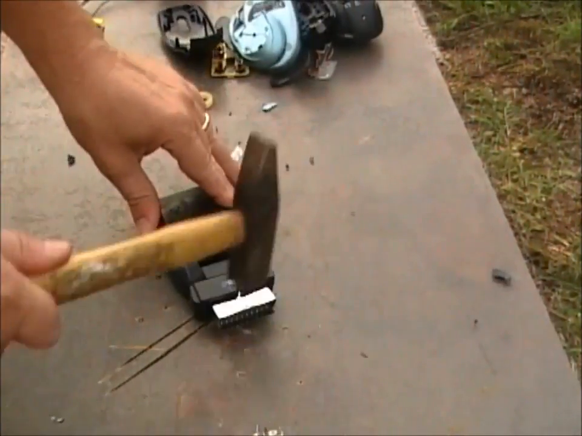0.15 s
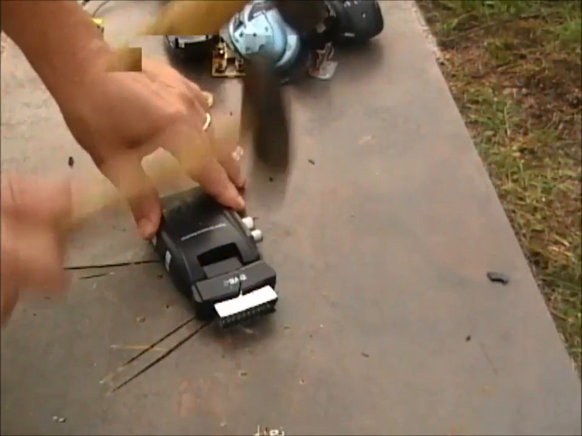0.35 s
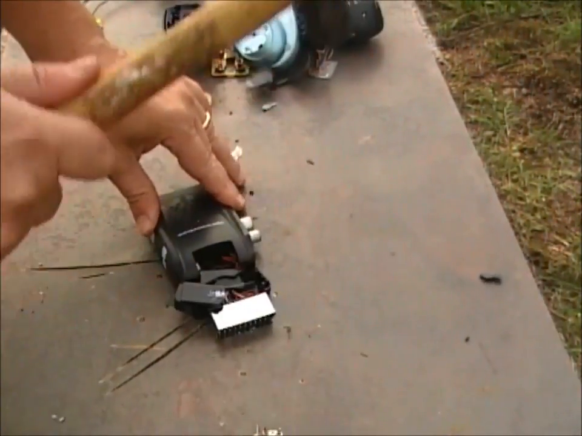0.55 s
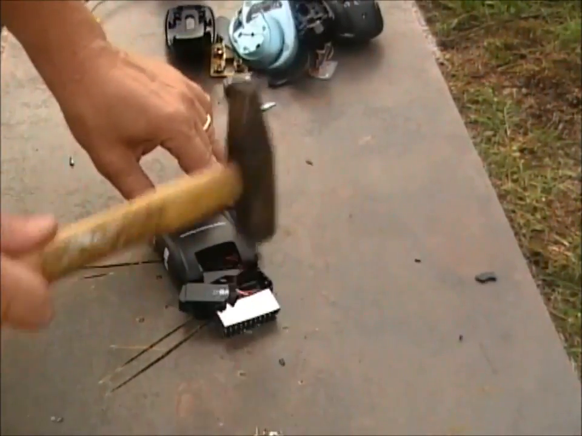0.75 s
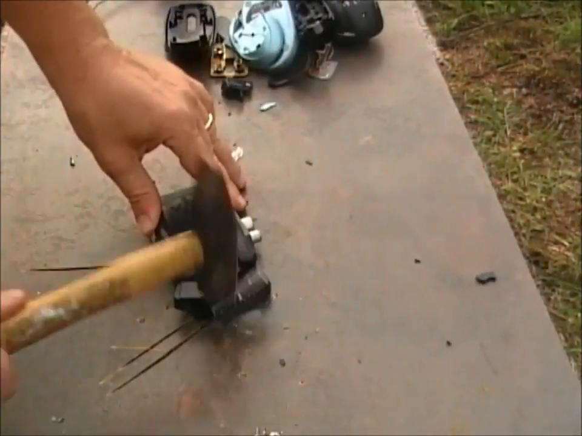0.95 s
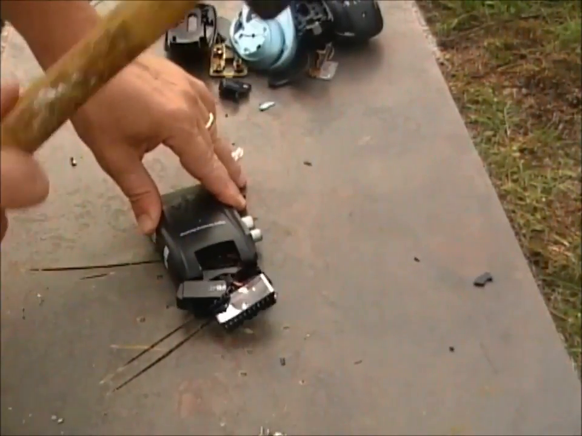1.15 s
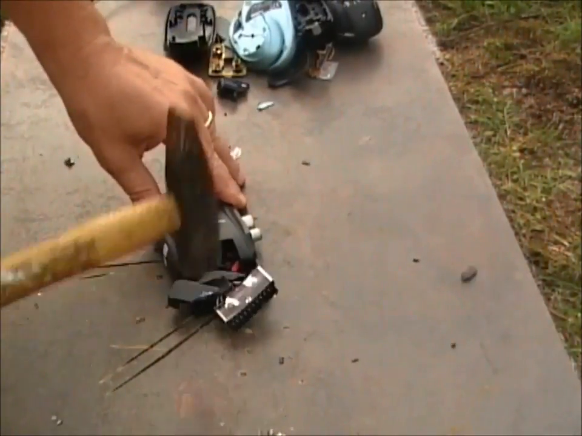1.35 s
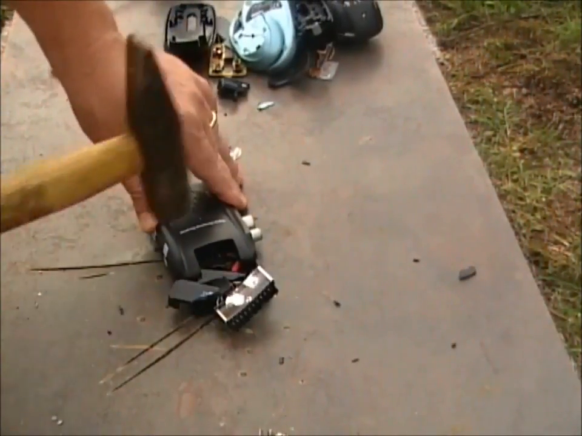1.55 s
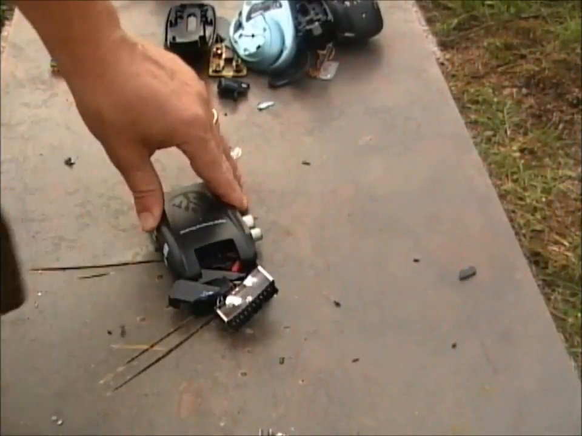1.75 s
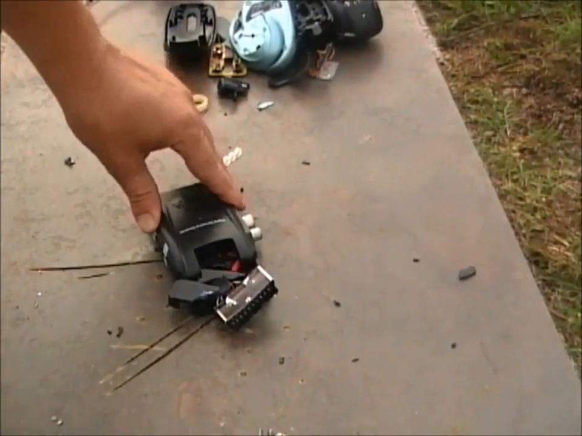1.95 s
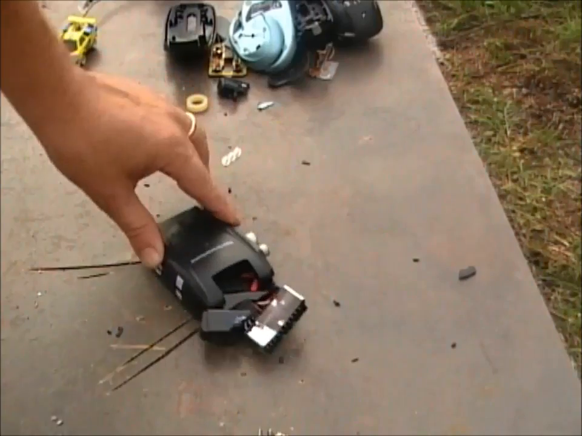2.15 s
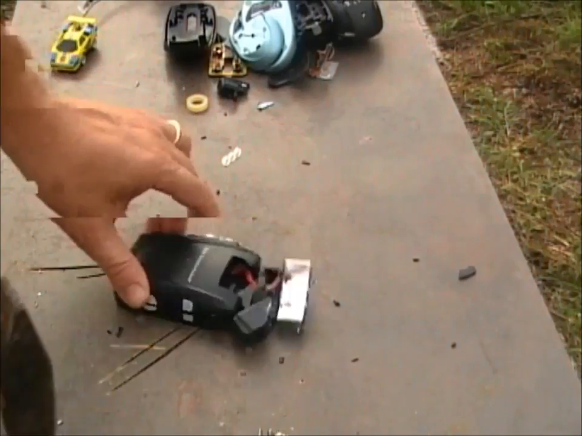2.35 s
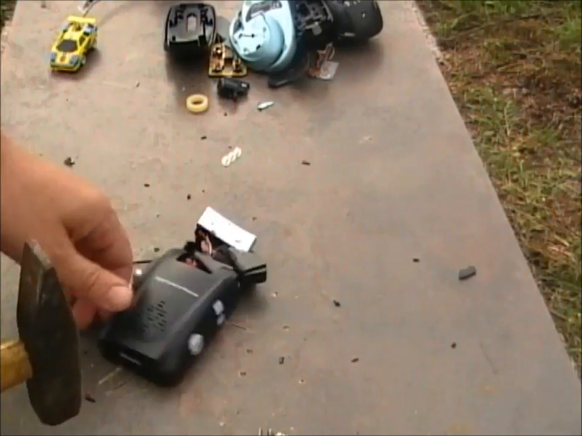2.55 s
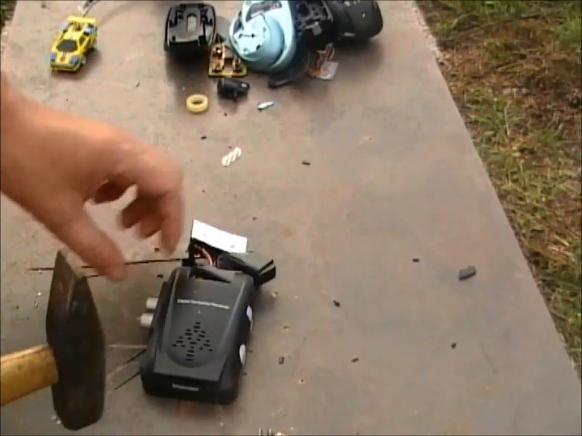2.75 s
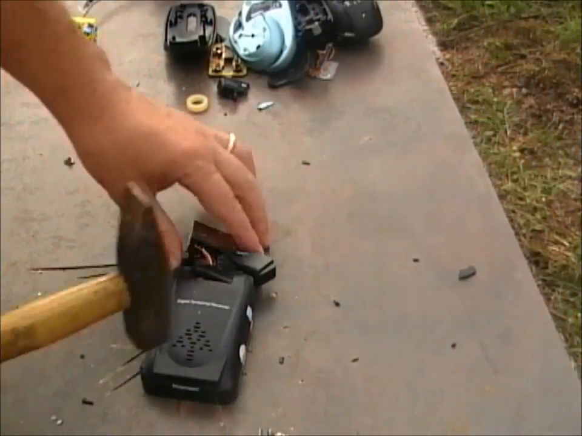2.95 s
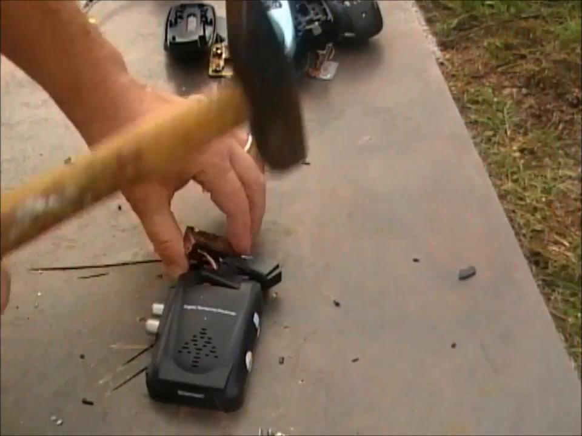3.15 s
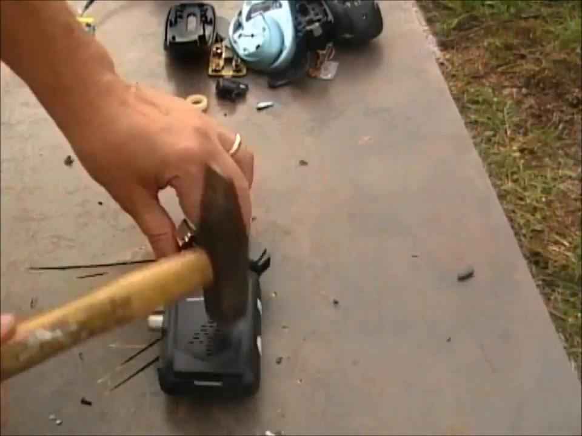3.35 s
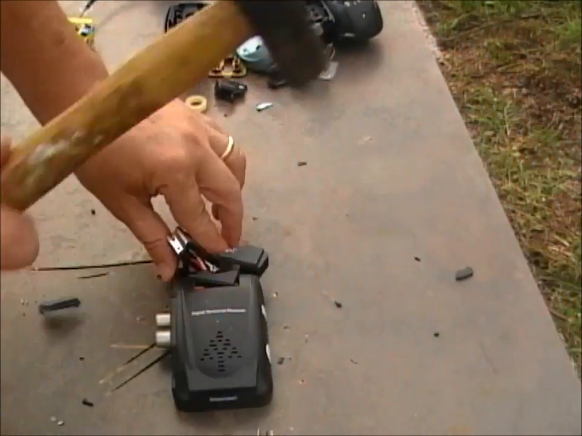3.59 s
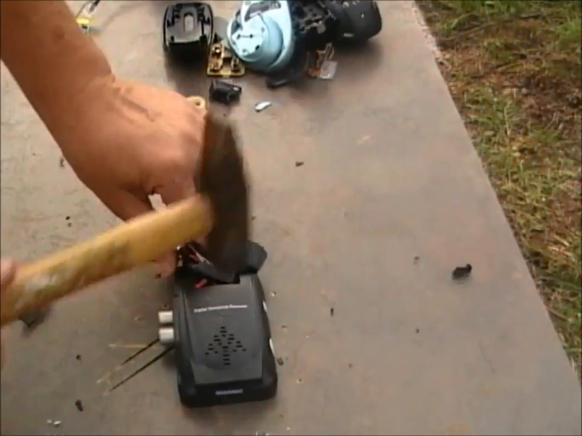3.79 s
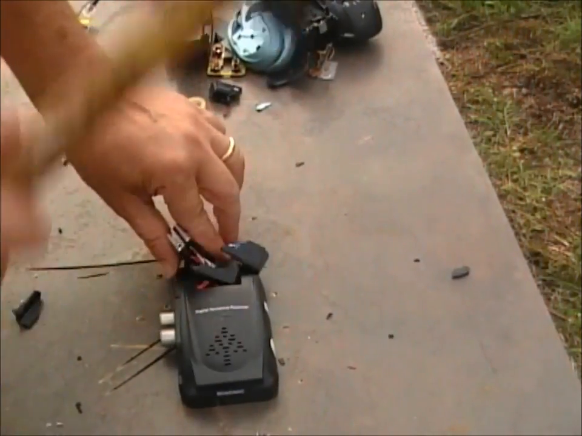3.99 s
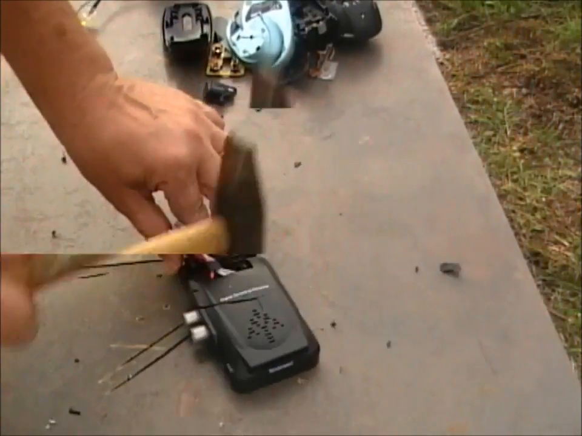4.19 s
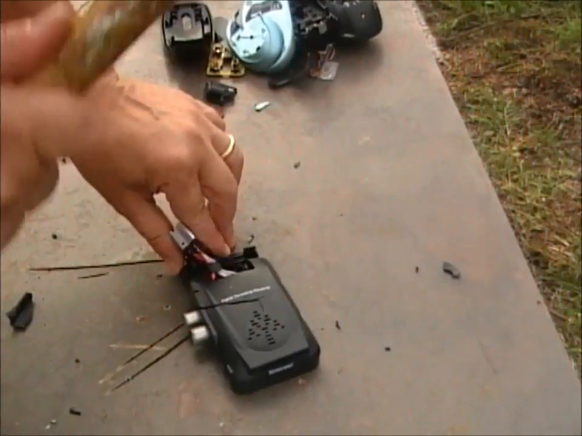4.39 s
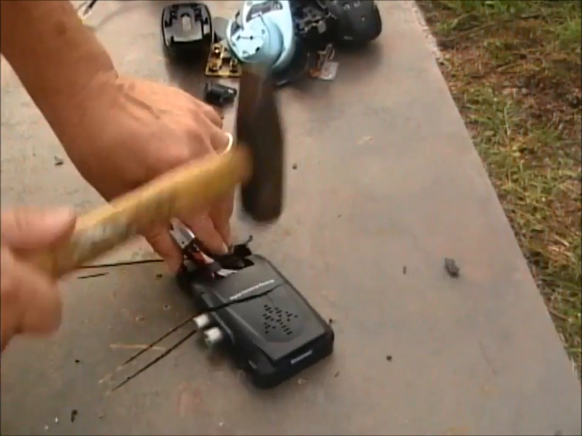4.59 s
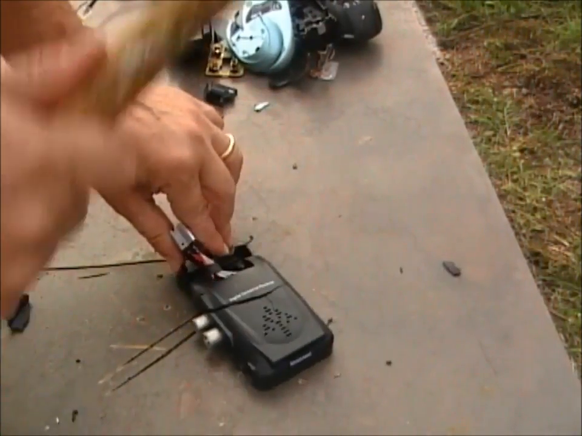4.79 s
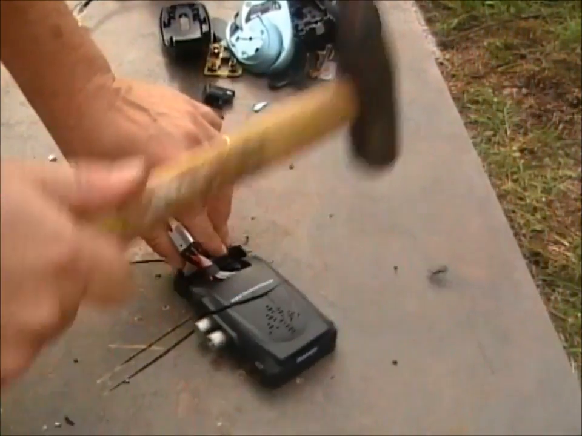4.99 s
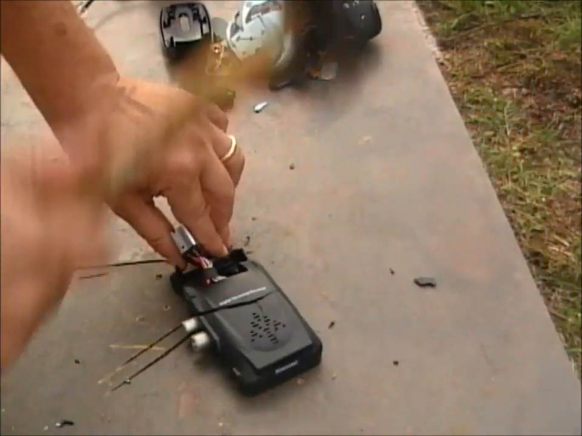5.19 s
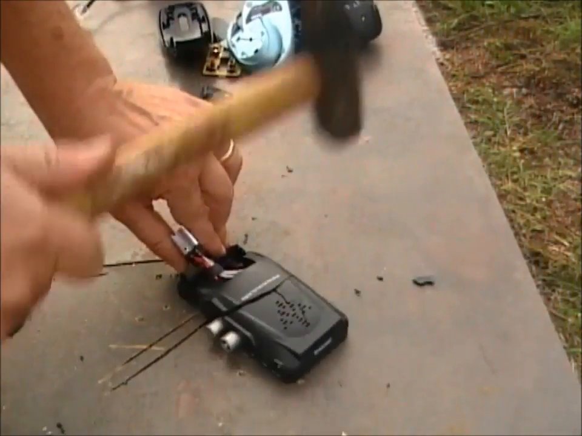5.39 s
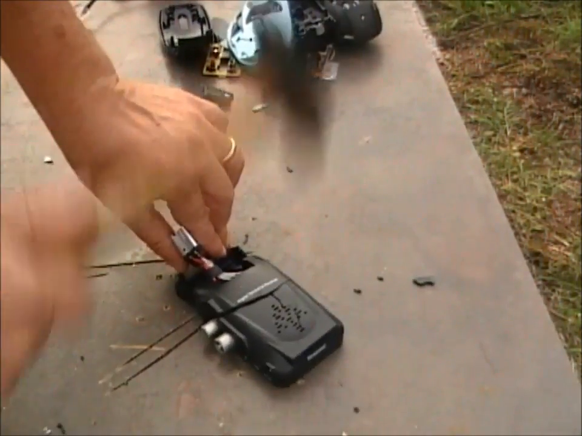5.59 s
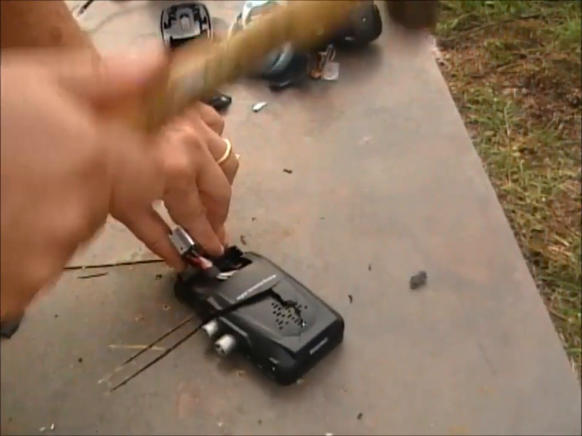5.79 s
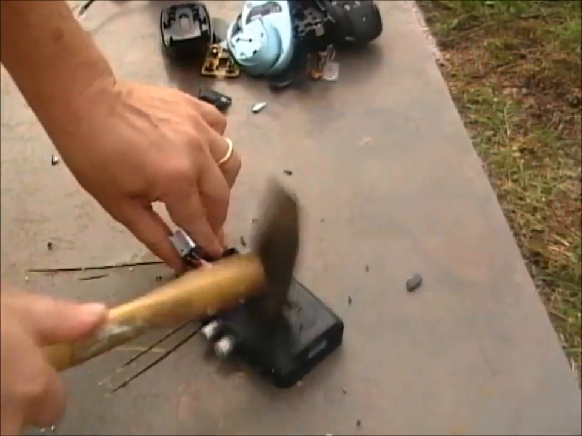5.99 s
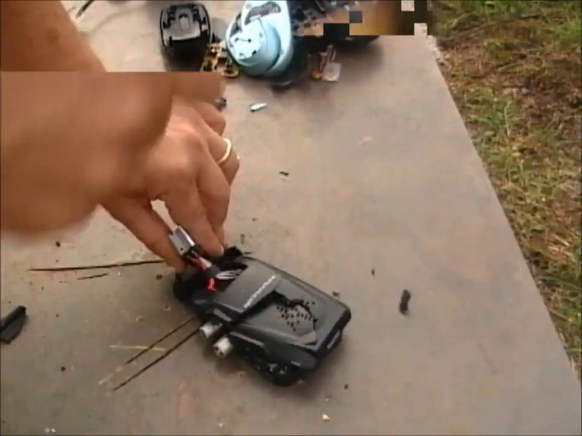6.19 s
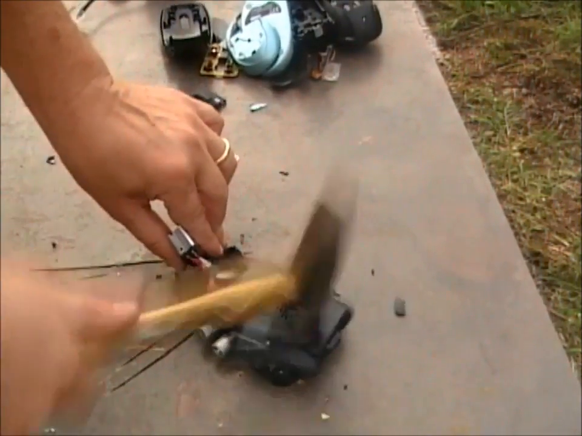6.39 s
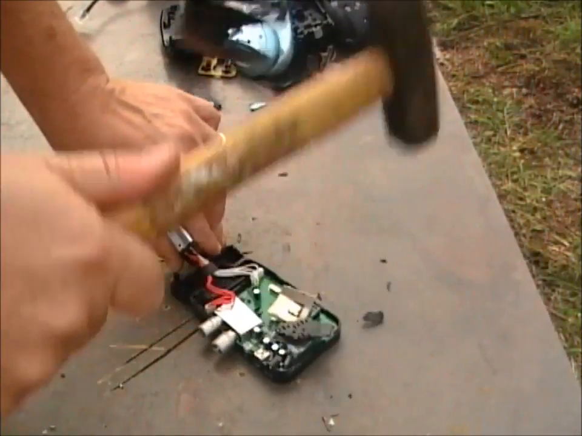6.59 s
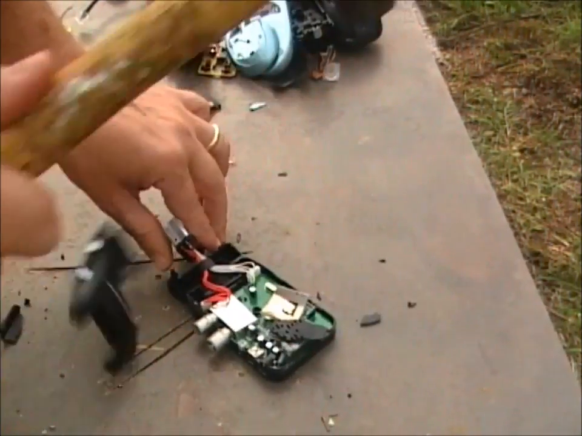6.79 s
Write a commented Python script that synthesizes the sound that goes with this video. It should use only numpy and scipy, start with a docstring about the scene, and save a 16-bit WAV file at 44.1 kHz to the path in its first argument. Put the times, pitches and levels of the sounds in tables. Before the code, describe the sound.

Outdoors, a hammer strikes a hollow plastic box on a hard board: five quick, loud cracks with short hollow knocks and small clicking bounces. A gritty, slightly metallic scrape follows as the box is dragged and turned. Nine slower blows then smash the casing, each trailed by rattling plastic pieces. Faint low traffic hums behind. Close, thin camcorder sound, the peaks overloaded, with brief dropouts.

```python
"""A hammer beats a plastic electronics box on a hard board outdoors: noise bursts ring the shell, clicks are pieces bouncing.
Then the box is dragged over the gritty board (grainy noise through resonances), and a second series of blows follows.
Low modes, rumble and far-wall echoes accompany the blows; far traffic hums throughout as shaped noise.
A tape camcorder listens: bass cut, overload, comb against head-drum whine, a few lost frames, top cut."""
import sys
import numpy as np
from scipy import signal
from scipy.fft import rfft, irfft
from scipy.io import wavfile

SR = 44100
rng = np.random.default_rng(int(sys.argv[2]) if len(sys.argv) > 2 else 0)


def wrap_up_sound(samples):
    """Save the sound to the file named by the first command line argument, as 16-bit audio."""
    columns = np.atleast_2d(samples).T
    # keep every value between -1 and 1, then stretch to whole-number steps
    tamed = np.clip(columns, -1, 1)
    steps = np.round(tamed * 32767).astype(np.int16)
    wavfile.write(sys.argv[1], SR, steps)


N = 301599

# hammer blows, levels relative within each layer: (time [s], impact [dB], crack [dB], splinters [dB],
# hollow box [dB], board [dB], deep push [dB], upper box modes [dB])
BLOWS = [(0.117, 4.5, -9, -29.5, -27.5, -36.5, -37.5, -36.5),
         (0.415, 5, -8, -32.5, -25.5, -36, -46.5, -17.5), (0.709, 2, -21.5, -36, -6, -15, -35.5, -4.5),
         (0.9842, -6, -7, -34.5, -8.5, -13, -39, -8.5), (1.262, 1.5, -23, -29.5, -7.5, -13, -49.5, -7),
         (3.3283, 15, 8, -25.5, -32.5, -15.5, -23.5, -29.5), (3.7049, 1, 1, -25.5, -14, -21.5, -38, -14),
         (4.0804, 3, -5.5, -24.5, -21.5, -8.5, -14.5, -25),
         (4.5159, 0, -6.5, -25.5, -27.5, -19, -25.5, -16), (4.8993, 2, -6.5, -28.5, -8, -13.5, -38, -7),
         (5.2699, -7, -5.5, -26.5, -6.5, -14, -52, -5.5), (5.6591, 4.5, -18.5, -27.5, -4.5, -15, -41, -3),
         (6.0315, -4, -7.5, -23, -3.5, -12, -44, -6), (6.4365, -6, -13, -22, -4.5, -12, -32, -6.5)]
# box and splinters falling back on the board, levels relative:
# (time [s], level [dB], ring [Hz], ring against tick [dB], t60 [s], hollow box [dB])
BOUNCES = [(0.173, -17.5, 3580, 19.5, 0.048, -28), (0.2031, -23, 3630, 16, 0.054, -28),
           (0.279, -44, 6500, 8, .04, -55), (0.4906, -23, 4100, 15, 0.024, -26),
           (0.555, -23, 4650, 20.5, 0.025, -45), (0.6071, -31.5, 4610, 21, 0.055, -49),
           (0.617, -17, 9600, 7.5, 0.049, -42.5), (0.6673, -34.5, 4600, 23, 0.037, -53.5),
           (0.7854, -23, 4040, 21.5, 0.06, -26.5), (1.038, -23, 5100, 13, 0.087, -41),
           (1.0629, -23.5, 3480, 11, 0.082, -27.5), (1.3291, -21.5, 12900, 8, 0.081, -31),
           (1.534, -37.5, 4470, -1, 0.034, -81), (1.5673, -42, 11000, 11, 0.035, -70),
           (1.6306, -37, 9460, 22, 0.039, -74), (1.644, -34.5, 10200, 24.5, .046, -69),
           (1.6764, -41, 9800, 18, .034, -69), (1.7028, -38, 10180, 20.5, 0.093, -72),
           (1.8298, -41, 1610, 4, .093, -71), (2.6922, -27, 11800, 11, 0.031, -61),
           (3.0215, -31.5, 3300, 12, 0.11, -34), (3.262, -43, 8500, 23.5, .06, -47),
           (3.3916, -28, 1550, 6, .053, -26.5), (3.4231, -20.5, 4160, 18, 0.087, -24),
           (3.4735, -21, 1600, 10, 0.033, -28.5), (3.5153, -29, 1840, 4, 0.023, -62),
           (3.5563, -27, 5930, 15, 0.021, -50.5), (3.611, -39, 7000, 5.5, 0.043, -43),
           (3.6297, -30, 5800, 16.5, .041, -47), (3.6822, -29.5, 6500, 3, 0.025, -46),
           (3.7286, -27, 4200, 16.5, 0.29, -24.5), (3.758, -4, 1640, 2, 0.079, -25.5),
           (3.8011, -13.5, 4130, 18, 0.029, -28.5), (3.8406, -43, 4340, 24, 0.16, -41),
           (3.86, -15.5, 1620, 12.5, 0.019, -29), (3.927, -42.5, 4760, 24, 0.036, -49),
           (3.9938, -34.5, 8800, 16, 0.029, -58), (4.0257, -52, 8600, 25, 0.066, -70.5),
           (4.1227, 0.5, 6960, -0.5, 0.065, -21), (4.132, 1, 3140, 8, 0.047, -15.5),
           (4.1759, -15, 7070, 13, 0.033, -22), (4.2268, -15, 4170, 18.5, 0.027, -33),
           (4.3497, -53, 2580, 3, .045, -38.5), (4.4162, -43, 9040, 15, 0.094, -63),
           (4.573, -24, 1640, 16, 0.066, -26), (4.6159, -14.5, 4160, 22.5, 0.03, -22.5),
           (4.6665, -21.5, 4100, 17, .048, -34.5), (4.736, -41, 8300, 16, 0.12, -53),
           (4.828, -46.5, 8400, 25.5, 0.094, -60), (4.8575, -38, 8240, 14, 0.083, -41),
           (4.9966, -12, 7740, 7, 0.045, -20), (5.0454, -29.5, 4140, 3, 0.096, -26.5),
           (5.1413, -34.5, 2460, 13, 0.056, -40), (5.3681, -15.5, 7700, 5, 0.12, -23),
           (5.4225, -21, 7500, -13, 0.19, -35.5), (5.505, -39, 9600, 2, 0.079, -60),
           (5.5488, -44, 5430, 7, .07, -71), (5.7, -6.5, 3540, 14.5, 0.095, -19),
           (5.7514, -19, 2960, 11, 0.099, -21), (5.7978, -27.5, 2510, 13, 0.054, -25),
           (5.8247, -37, 7000, 6, 0.044, -33.5), (5.8726, -41.5, 5900, 15, 0.097, -43),
           (6.0739, -2, 3700, 14.5, 0.03, -14), (6.127, -15, 2840, 6, .11, -33),
           (6.1392, -25, 7660, 9, 0.032, -21.5), (6.1834, -18.5, 3840, 5, 0.12, -22.5),
           (6.2885, -37.5, 7900, 19, 0.14, -41), (6.4879, -16, 4180, 19.5, 0.12, -37),
           (6.5409, -19.5, 4120, 11, 0.14, -21), (6.5981, -19, 4000, 13.5, 0.065, -28),
           (6.6258, -28, 3190, 11, 0.28, -23.5), (6.7274, -15.5, 2680, 12.5, 0.023, -63)]


def from_db(db):
    """Gain of a level in dB."""
    return 10 ** (np.asarray(db) / 20)


def rms_one(x):
    """Scaled to rms 1."""
    return x / np.sqrt(np.mean(x ** 2) + 1e-20)


def bandpass(x, order, edges_hz):
    """Butterworth band-pass."""
    return signal.sosfilt(signal.butter(order, edges_hz, "band", fs=SR, output="sos"), x)


def highpass(x, hz):
    """First-order bass cut."""
    return signal.sosfilt(signal.butter(1, hz, "high", fs=SR, output="sos"), x)


def curve(rows, column):
    """One dB column as a gain in time, -120 dB outside the table."""
    rows = np.array(rows)
    db = np.interp(np.arange(N) / SR, rows[:, 0], rows[:, column], left=-120, right=-120)
    return from_db(db)


def coloured(x, spectrum, tilt_db_per_octave=0.):
    """Noise shaped by a spectrum and tilted about 4 kHz (tilt gain constant below 500 Hz), rms 1."""
    hz = np.maximum(np.fft.rfftfreq(x.shape[-1], 1 / SR), 1)
    points = np.array(spectrum)
    db = np.interp(np.log(hz), np.log(points[:, 0]), points[:, 1])
    db += tilt_db_per_octave * np.log2(np.maximum(hz, 500) / 4000)
    return rms_one(irfft(rfft(x) * from_db(db), x.shape[-1]))


def resonance(x, hz, width_hz):
    """Two-pole peak of gain about 1."""
    r = np.exp(-np.pi * width_hz / SR)
    numerator = np.array([1, 0, -1]) * (1 - r * r) / 2
    return signal.lfilter(numerator, [1, -2 * r * np.cos(2 * np.pi * hz / SR), r * r], x)


def ring(clicks, hz, t60_s):
    """A unit click sets a decaying sine of initial height 1 ringing."""
    r, w = from_db(-60 / (t60_s * SR)), 2 * np.pi * hz / SR
    return signal.lfilter([0, np.sin(w)], [1, -2 * r * np.cos(w), r * r], clicks + 1e-18)


def pair(count, side_db):
    """Stereo noise: a shared part plus an opposed part at side_db against it."""
    mid, side = rng.standard_normal((2, count))
    return mid + from_db(side_db) * side * [[1], [-1]]


def grainy(count, grain_s, spread_db):
    """Uneven gain of rms 1: random level per grain, interpolated in dB."""
    knots = np.arange(0, count + grain_s * SR + 1, grain_s * SR)
    level = np.interp(np.arange(count), knots, rng.standard_normal(len(knots)))
    return rms_one(from_db(spread_db * level))


def patter(x, grain_s, spread_db):
    """Each frequency band patters separately, under its own uneven gain."""
    # band edges: (frequency [Hz])
    edges_hz = [300, 1500, 3000, 5500, 9000, 18000]
    bands = zip(edges_hz, edges_hz[1:])
    return sum(bandpass(x, 1, band) * grainy(x.shape[1], grain_s, spread_db) for band in bands)


def add(out, s, sound):
    """Mixes a sound in at time s."""
    i = round(s * SR)
    out[:, i:i + sound.shape[1]] += sound[:, :N - i]


def dying(t, t60_s, rise_s):
    """Exponential rise (time constant rise_s) and fall."""
    return (1 - np.exp(-t / rise_s)) * from_db(-60 * t / t60_s)


def cracks():
    """Each blow: bright impact, fractures ringing the shell, then a splinter shower that dies more slowly."""
    # plastic shell modes: (frequency [Hz], width [Hz], level [dB])
    shell_modes = [(1366, 166, 4), (1807, 85, -3.5), (2220, 100, -18.5), (3220, 840, -3), (4430, 75, -18.5),
                   (6700, 230, -4.5), (8140, 200, 1.5), (11600, 490, -19)]
    # crack spectrum: (frequency [Hz], density [dB per Hz])
    crack_spectrum = [(150, -32), (500, 1.5), (1000, -10), (1800, -5.5), (3250, -4), (6000, -4),
                      (9900, -5.5), (15000, -8.5), (17000, -1.5)]
    t60_at_0_db_s, halving_db = 0.031, 11.5   # t60 doubles for each halving_db below 0 dB
    out, t = np.zeros((2, N)), np.arange(SR // 2) / SR
    for s, impact_db, crack_db, splinter_db, *_ in BLOWS:
        t60_s = t60_at_0_db_s * 2 ** (-crack_db / halving_db)
        noise = pair(len(t), side_db=-13.0)
        shell = sum(from_db(db + rng.normal(0, 3.5)) * resonance(noise, hz, width_hz)
                    for hz, width_hz, db in shell_modes)
        ringing = coloured(noise + 1.3 * shell, crack_spectrum, tilt_db_per_octave=-1.5)
        bright = coloured(noise, crack_spectrum, tilt_db_per_octave=2.2)
        impact = from_db(impact_db + 3.0) * dying(t, .016, .0004) * bright
        burst = from_db(crack_db) * dying(t, t60_s, 0.00044) * grainy(len(t), 0.0031, 0.75)
        shower = from_db(splinter_db) * dying(t, 0.44, 0.0016) * grainy(len(t), .003, 5.4)
        shower = shower * patter(ringing, grain_s=.005, spread_db=9.0)
        add(out, s - .0004, impact + ringing * burst + shower)
    return out


def falls():
    """Every piece that falls back: the table, and one random light crumb after each blow."""
    count = len(BLOWS)
    times_s = np.array(BLOWS)[:, 0] + rng.uniform(0.099, 0.16, count)
    rings_hz = 4500 * (12000 / 4500) ** rng.random(count)
    levels_db = -47 + 6 * rng.random(count)
    ring_db, t60_s = 16, 0.035
    crumbs = [(s, db, hz, ring_db, t60_s) for s, db, hz in zip(times_s, levels_db, rings_hz)]
    return BOUNCES + crumbs


def bounces():
    """Each fall-back: a tick and a fading run of random clicks excite the ring of the piece that lands."""
    chatter_per_s, chatter_per_db = 1200, 1.2   # click rate of a 0 dB piece; lighter pieces chatter less
    heavy_rise_s, rise_per_db = .003, 1.22   # rise of a 0 dB piece; lighter ones start more sharply
    tick_octaves, tick_octaves_per_db = 2.8, .045   # spread each side of the ring at 0 dB; lighter: less
    out, t = np.zeros((2, N)), np.arange(SR // 7) / SR
    for s, db, hz, ring_db, t60_s, *_ in falls():
        spread = 2 ** max(tick_octaves + tick_octaves_per_db * db, .6)
        pan_db = rng.normal(-2, 2.5)   # left minus right
        touched = rng.random(len(t)) < chatter_per_s * from_db(chatter_per_db * db) / SR
        clicks = touched * rng.uniform(-4.0, 14.0, len(t))
        clicks[np.flatnonzero(t > .0001)[0]] = 7.7   # the first touch
        # heavy pieces scratch more
        scratch = np.clip(1.18 + db / 45, .25, 1.2) * pair(len(t), side_db=-16.5)
        fall = dying(t, t60_s, heavy_rise_s * from_db(rise_per_db * db))
        noise = (clicks + scratch * grainy(len(t), .0015, 5)) * fall
        noise *= np.sqrt(np.mean(fall ** 2)) / np.sqrt(np.mean(noise ** 2))
        tick = bandpass(noise, 2, [max(hz / spread, 400), min(hz * spread, 19000)])
        width_hz = (70 + 0.0073 * hz) * from_db(max(db + 12.5, 0))   # heavy pieces ring broader
        piece = resonance(noise, hz, width_hz) + 0.15 * resonance(noise, min(1.85 * hz, 15000), 220.0)
        landing = from_db(db - 8.0) * (tick + from_db(ring_db) * piece)
        add(out, s - .0003, landing * from_db([[pan_db / 2], [-pan_db / 2]]))
    return out


def rocking():
    """The box rocks on: faint random pushes that die away after each blow."""
    out, t = np.zeros((1, N)), np.arange(SR // 2) / SR
    for s, _, _, splinter_db, *_ in BLOWS:
        add(out, s, from_db(splinter_db - 23) * dying(t, 0.38, 0.014)[None])
    return out[0] * grainy(N, .01, 5.0)


def boom():
    """Blows, bounces and rocking push the low modes of box and board through a soft contact (low-pass)."""
    # hollow box on the board: (frequency [Hz], relative level [dB], t60 [s])
    box_modes = [(124, -37, 0.013), (212.7, -6, 0.12), (380.4, -4.5, 0.092), (424.8, -12.5, 0.16),
                 (536.7, -4.5, 0.062), (621, -23, 0.23), (742, -21.5, 0.22)]
    thump_db, thump_per_db = -21.5, 0.93   # the board answers a share of each bounce's hollow knock
    blows, landings, out = np.array(BLOWS), np.array(BOUNCES), np.zeros(N)
    at = np.round(np.r_[blows[:, 0] + .0016, landings[:, 0]] * SR).astype(int).clip(0, N - 1)
    low_db = np.r_[blows[:, 5], thump_db + thump_per_db * landings[:, 5]] + 2.5
    middle_db = np.r_[blows[:, 4] + 1.5, landings[:, 5] - 4.0]
    high_db = np.r_[blows[:, 7] + 3.0, landings[:, 5] - 4.0]
    pushes = rocking()
    chance_db = rng.normal(0, 1.8, (len(at), len(box_modes)))
    for k, (hz, db, t60_s) in enumerate(box_modes):
        strike_db = low_db if k < 2 else middle_db if k < 4 else high_db
        clicks = from_db(db) * pushes * rng.standard_normal(N)
        clicks[at] += from_db(strike_db + db + chance_db[:, k])
        out += ring(clicks, hz, t60_s) * grainy(N, .008, 3)   # the loose shell makes each mode waver
    return signal.lfilter(*signal.butter(2, 900, fs=SR), out)


def rumble():
    """The board shudders under each blow: a deep 100 Hz push, a dull knock, and low noise dying in two stages."""
    shudder, knock, push = np.zeros((2, N)), np.zeros((2, N)), np.zeros((1, N))
    t = np.arange(SR // 2) / SR
    for s, _, _, _, box_db, _, push_db, _ in BLOWS:
        shudder_db = -15 + 0.25 * box_db   # grows a little with the hollow knock
        decay = dying(t, 0.098, 0.00053) + 0.13 * dying(t, 0.43, .01)
        add(shudder, s, from_db(shudder_db) * pair(len(t), side_db=-6.0) * decay)
        add(push, s, from_db(push_db) * np.sin(2 * np.pi * 100 * t)[None] * dying(t, 0.07, .001))
        add(knock, s, from_db(box_db - 4.5) * pair(len(t), side_db=-13.5) * dying(t, 0.048, 0.00078))
    return 3.82 * bandpass(shudder, 2, [110, 800]) + push + 4.0 * resonance(knock, 470, 300)


def drag():
    """Dense grit under the box: fine grains drive thin metal rings, coarser scratches drive the shell."""
    # two drags: (time [s], hiss [dB], body [dB]), relative levels
    strokes = [
        [(2.0, -92, -81), (2.048, -48, -45.5), (2.136, -55.5, -49.5), (2.216, -42.5, -41), (2.288, -61, -54),
         (2.33, -52, -46.5), (2.44, -38.5, -39.5), (2.54, -39, -39), (2.576, -49, -35.5), (2.706, -50.5, -47.5),
         (2.742, -81, -70)],
        [(2.99, -69, -70), (3.028, -47, -39), (3.07, -56.5, -51.5), (3.25, -68, -68), (3.264, -50, -52.5),
         (3.32, -60, -57)],
    ]
    # metal parts singing: (frequency [Hz], width [Hz], level [dB])
    metal_modes = [(7800, 420, -3.5), (8800, 170, -9), (9370, 88, 4), (10000, 110, -5), (11000, 150, 4),
                   (11100, 80, -4.5), (12670, 80, 7), (14700, 200, -16.5)]
    # shell under the drag: (frequency [Hz], width [Hz], level [dB])
    dragged_modes = [(593, 53, 5.5), (790, 190, 0), (1660, 270, 3), (2970, 140, -4.5)]
    a, b = round(strokes[0][0][0] * SR), round(strokes[-1][-1][0] * SR)
    count = b - a
    grit = pair(count, side_db=-12.0) * grainy(count, 0.0033, 1.9)
    hiss = bandpass(grit, 2, [3500, 13000])
    rings = sum(from_db(db) * grainy(count, .03, 5) * resonance(grit, hz, width_hz)
                for hz, width_hz, db in metal_modes)
    scratch = pair(count, side_db=-21.5) * grainy(count, 0.0088, 2.1)
    body = bandpass(scratch, 2, [1200, 4000])
    rasp = sum(from_db(db) * grainy(count, 0.012, 4.0) * resonance(scratch, hz, width_hz)
               for hz, width_hz, db in dragged_modes)
    fine, coarse = (sum(curve(rows, k) for rows in strokes)[a:b] for k in (1, 2))
    # singing gain: 8 dB where the hiss curve is -45 dB, 0.28 dB more per dB of hiss
    singing = from_db(8) * (fine / from_db(-45)) ** 0.28
    fine_sound = fine * (patter(hiss, grain_s=0.014, spread_db=3.5) + singing * rings)
    coarse_sound = coarse * (patter(body, grain_s=0.019, spread_db=5.5) + from_db(9) * rasp)
    out = np.zeros((2, N))
    out[:, a:b] = fine_sound + coarse_sound
    return out * from_db([[-3.3], [-1.7]])


def echoes():
    """Far rough walls return each blow as soft-starting low thumps, slightly louder on the right."""
    # far walls: (delay [s], relative level [dB])
    walls = [(.232, 5), (.282, -7), (.332, -7.5)]
    blows, clicks = np.array(BLOWS), np.zeros(2 * N)
    for late_s, db in walls:
        at = np.round((blows[:, 0] + late_s) * SR).astype(int)
        clicks[at] += from_db(-41.5 + db + rng.normal(0, 1.5, len(blows)))
    clicks = clicks[:N]
    swell = ring(clicks, 200, 0.053) - ring(clicks, 200, 0.017)   # the difference blunts the start
    thump = swell + from_db(-15.5) * ring(clicks, 460, 0.098)
    return thump * from_db([[-1.], [1.]])


def background():
    """Lumpy shaped-noise hum of far traffic, a far motor's narrow drone and faint microphone hiss."""
    # background level: (time [s], level [dB])
    level = [(0.0, -51.5), (0.17, -70), (0.65, -61.5), (1.24, -75), (1.5, -62), (2.0, -58), (2.32, -50),
             (3.77, -54), (4.55, -66), (5.22, -63), (5.6, -68), (6.55, -63), (6.84, -59.5)]
    # hum spectrum: (frequency [Hz], density [dB per Hz])
    hum_spectrum = [(24, -41), (40, -21.5), (83, -6.5), (290, -8), (329, -2.5), (402, -7.5), (479, -7.5),
                    (1270, -16.5), (1550, -21.5), (2210, -20.5), (3740, -26.5), (7170, -24), (16000, -51.5)]
    drone_hz, drone_db, hiss_db = 316.2, -8.5, -12.5   # levels against the hum
    hum = coloured(pair(N, side_db=-4.0), hum_spectrum) * grainy(N, 0.041, 0.52)
    drone = resonance(pair(N, side_db=-6.5), drone_hz, 6.3)
    drone = rms_one(resonance(drone, drone_hz, 6.3))
    hiss = pair(N, side_db=1.0)
    mix = hum + from_db(drone_db) * drone + from_db(hiss_db) * hiss
    return curve(level, 1) * mix * from_db([[-.6], [.6]])


def scene():
    """All sources at the two microphones."""
    return cracks() + bounces() + boom() + rumble() + drag() + echoes() + background()


def record(dry):
    """Bass cut, firm overload, comb notching the drum whine and its multiples, lost frames, top cut."""
    # frames lost on tape, a constant replaces the sound: (time [s], channel, held value)
    dropouts = [(2.4011, 0, 0.), (6.2009, 1, -.165), (6.3609, 0, .029), (6.3609, 1, .024)]
    # one wrong sample: (time [s], channel, height added)
    tape_tick = (6.16095, 1, .65)
    frame_s, drum_hz, cutoff_hz, top = .04, 150, 16200, .72
    lag = round(SR / drum_hz)
    thin = highpass(dry, 60)
    clipped = thin / (1 + (thin / top) ** 4) ** .25
    clipped = highpass(clipped, 45)
    turns = np.pad(clipped, ((0, 0), (0, -N % lag))).reshape(2, -1, lag)   # one drum turn a row
    tape = signal.lfilter([1, -.97], [1, -.5], turns, axis=1).reshape(2, -1)[:, :N]
    for s, channel, held in dropouts:
        tape[channel, round(s * SR):round((s + frame_s) * SR)] = held
    s, channel, height = tape_tick
    tape[channel, round(s * SR)] += height
    top_cut = signal.cheby2(14, 60, cutoff_hz, fs=SR, output="sos")
    return signal.sosfilt(top_cut, np.clip(tape, -.88, .88))


dry = scene()
out = record(dry)
wrap_up_sound(out)
```